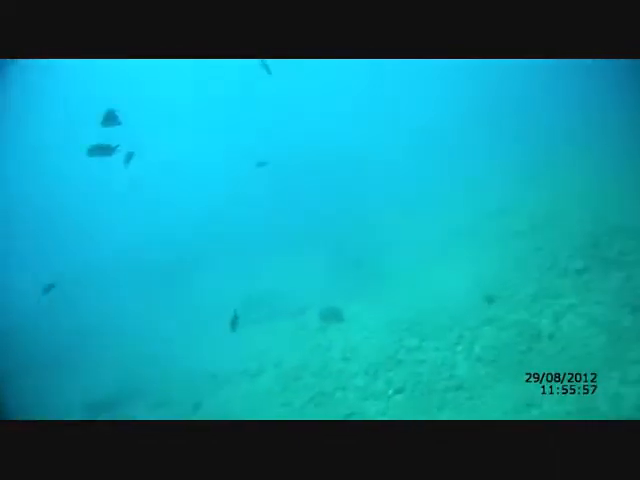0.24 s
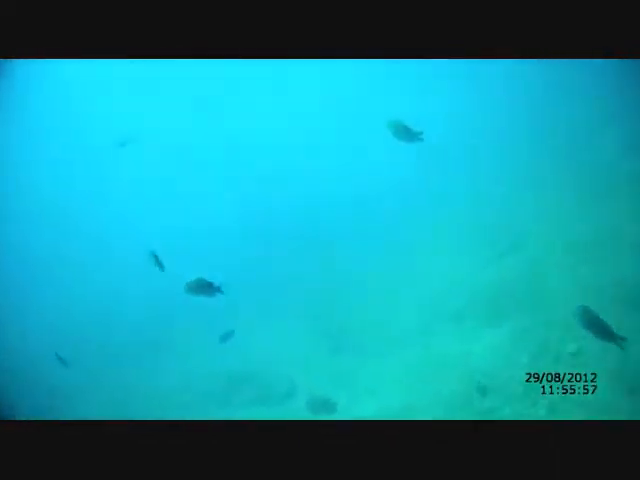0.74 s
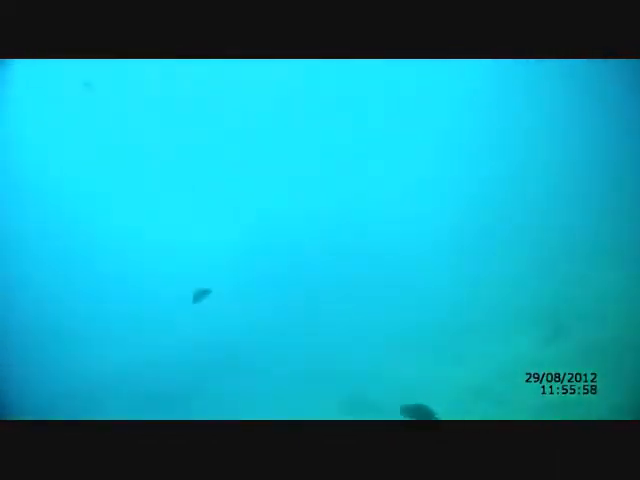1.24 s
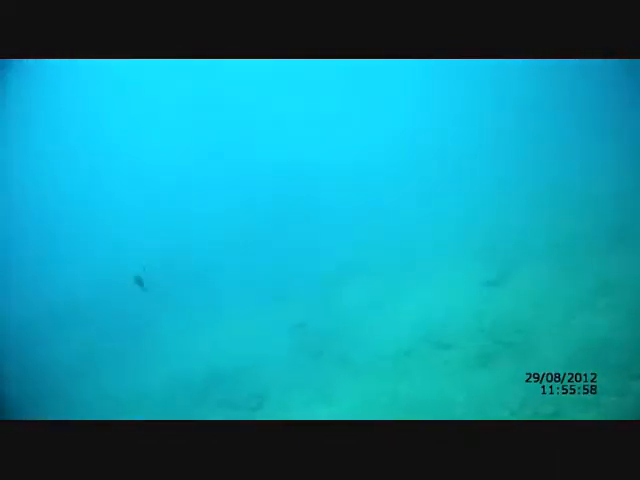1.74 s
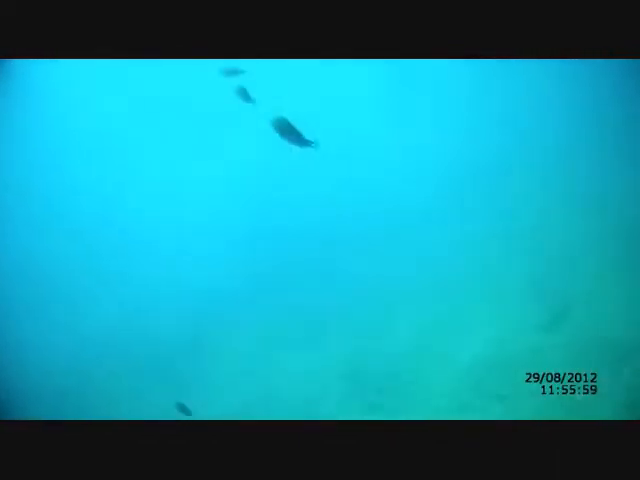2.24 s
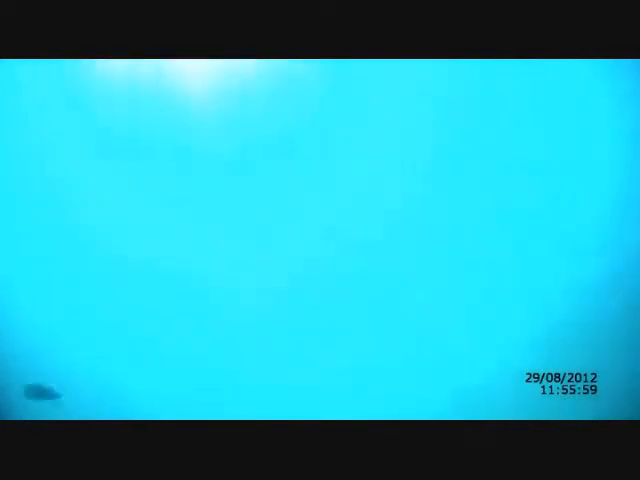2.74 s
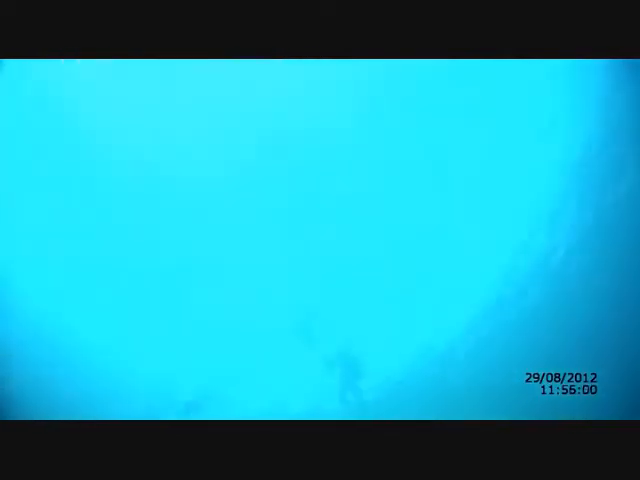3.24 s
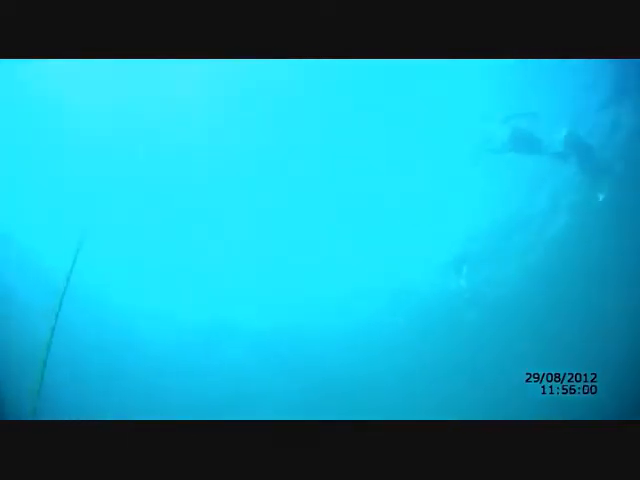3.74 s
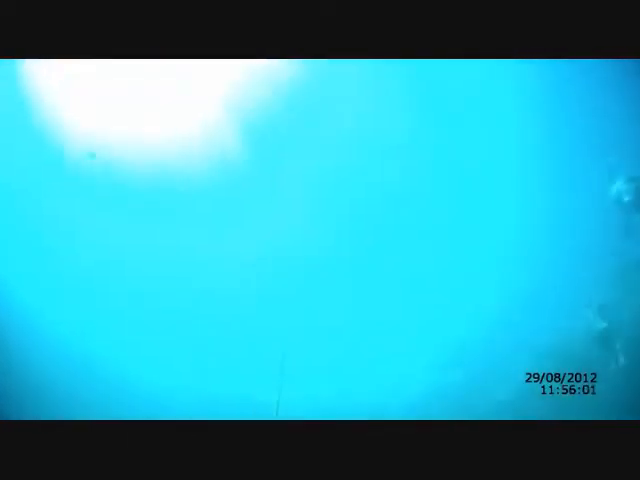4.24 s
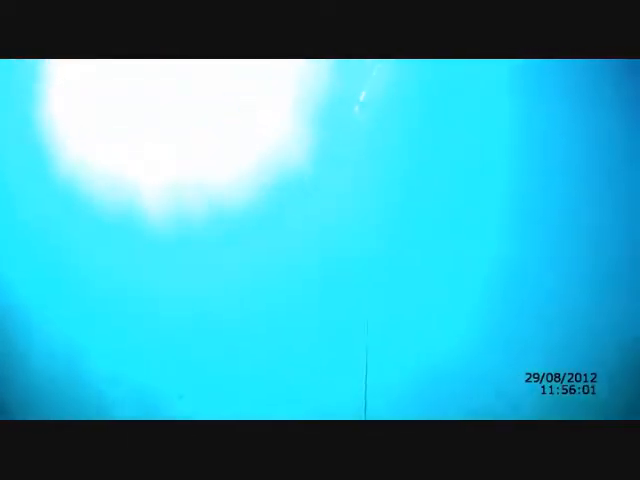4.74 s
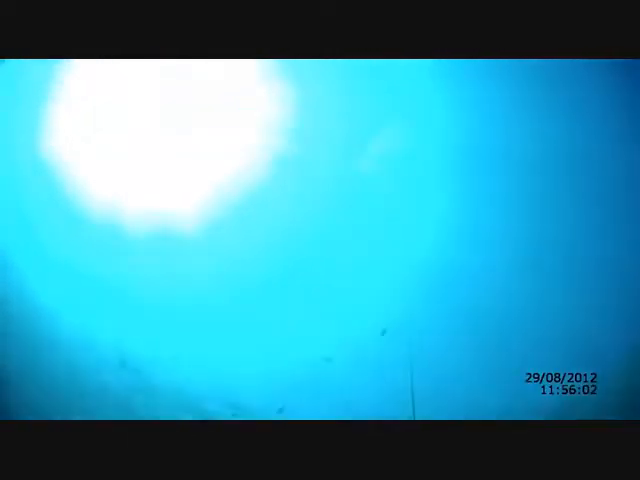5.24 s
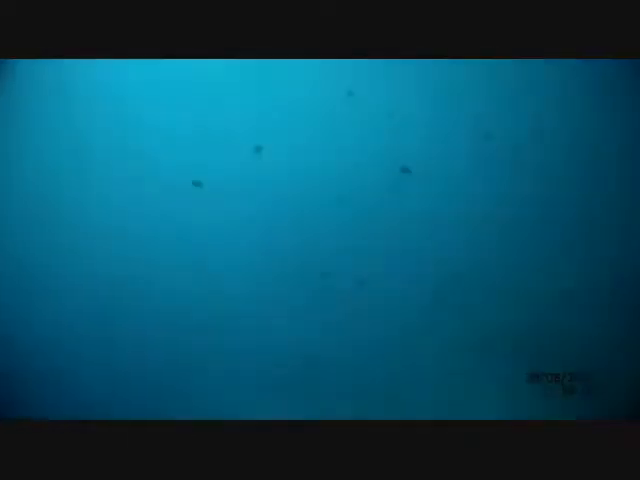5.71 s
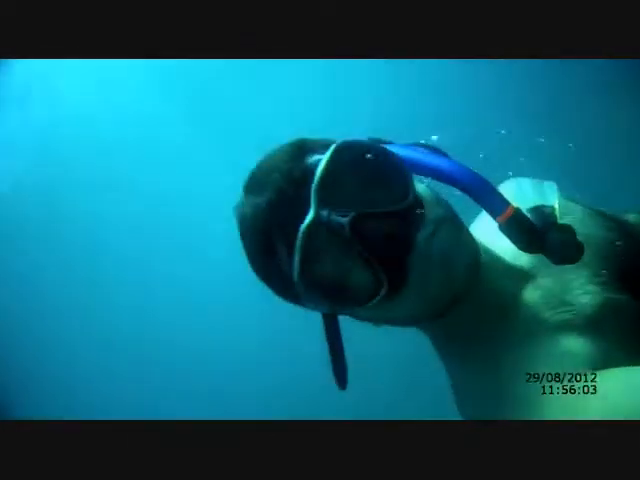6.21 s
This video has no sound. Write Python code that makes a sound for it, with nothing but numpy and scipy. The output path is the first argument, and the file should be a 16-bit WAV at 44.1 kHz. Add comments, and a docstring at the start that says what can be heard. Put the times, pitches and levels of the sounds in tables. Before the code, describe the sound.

Underwater, heard from inside a waterproof camera case: a quiet steady hiss full of fine crackle and sharp little shrimp snaps. Stirred water gurgles and fizzes in brief surges. A wet gulp comes early, hollow bubble pops cluster in the middle, and near the end fingers judder and knock the case loudly, ending on a round pop. Sound leans left over low rumble.

```python
"""Under the sea above a stony bed: a camera in a waterproof case among snapping shrimp.
Near snaps are cracks with a brief high ring; far ones are smeared clicks over a hiss.
Stirred water is many short bubble notes: high plinks for the fizz, lower blips for the gurgle.
Pops, a gulp, finger taps, rubs and judders excite the modes of the case; soft pushes thud.
Below lie a swaying rumble and microphone hiss."""
import sys
import numpy as np
from scipy import signal
from scipy.fft import rfft, irfft, next_fast_len
from scipy.io import wavfile
from scipy.ndimage import uniform_filter1d

SR = 44100
rng = np.random.default_rng(int(sys.argv[2]) if len(sys.argv) > 2 else 0)


def generate_wav(sig):
    """Save sig (samples, or channels by samples) to the path in sys.argv[1] as 16-bit PCM at SR."""
    pcm = np.round(np.clip(np.atleast_2d(sig).T, -1, 1) * 32767).astype(np.int16)
    wavfile.write(sys.argv[1], SR, pcm)


N = 285327   # samples
PADDED = 2 * next_fast_len(N // 2 + SR // 4)   # transform length, samples

# Colour of shrimp crackle and fizz: pitch_hz, relative_gain_db
CRACKLE_COLOUR = [(400, -11), (800, -31.5), (1130, 5.5), (1500, -17.5), (2000, 2), (2900, -13.5),
                  (4000, -9.5), (4900, -0.5), (5800, 0.5), (7000, 1.5), (7700, -10), (9000, -12.5),
                  (10500, -18), (15000, -33)]


def from_db(db):
    """Decibels to gain."""
    return 10 ** (np.asarray(db) / 20)


def rms_one(x):
    """Scale to unit power."""
    return x / np.sqrt(np.mean(x ** 2) + 1e-20)


def gain_by_bin(points):
    """A (Hz, dB) table as gains on the bins of a padded transform."""
    hz, db = np.transpose(points)
    bin_hz = np.arange(PADDED // 2 + 1) * SR / PADDED
    return from_db(np.interp(np.log(bin_hz + 1), np.log(hz), db))


def colour(x, points):
    """Causal minimum-phase filter with the given gain curve, by folding its cepstrum."""
    cepstrum = irfft(np.log(gain_by_bin(points)))
    cepstrum[1:PADDED // 2] *= 2
    cepstrum[PADDED // 2 + 1:] = 0
    response = np.exp(rfft(cepstrum))
    return irfft(rfft(x, PADDED) * response)[..., :N]


def add(track, s, sound):
    """Mix a sound into a track at a time."""
    at = max(0, round(s * SR))
    track[at:at + len(sound)] += sound[:max(0, N - at)]


def at_peak(sound, db):
    """Scale a sound so that its loudest millisecond has the power of a sine of this peak height."""
    loudest_power = uniform_filter1d(sound ** 2, SR // 1000).max()
    return sound * from_db(db) / np.sqrt(2 * loudest_power)


def ring(hz, t60):
    """A sine that falls 60 dB in t60 seconds, cut at 0.1 s."""
    t = np.arange(SR // 10) / SR
    return np.sin(2 * np.pi * hz * t) * np.exp(-np.log(1000) * t / t60)


def bubble(hz, t60, swell_s=0.0036):
    """A bubble swells into its note and dies away."""
    swell = 1 - np.exp(-np.arange(SR // 10) / SR / swell_s)
    return ring(hz, t60) * swell


def thud(hz, cycles):
    """The case wall swings up within half a cycle and falls 60 dB in the given cycles."""
    return bubble(hz, cycles / hz, swell_s=1 / (np.pi * hz))


def contact(length_s, count=4):
    """A rough touch: a dying noise burst, repeatedly flattened to drive all pitches about evenly."""
    age = np.arange(SR // 10) / SR / length_s
    force = rng.standard_normal(len(age)) * np.exp(-age ** 2)
    for _ in range(count):
        phase = np.angle(rfft(force))
        force = irfft(np.exp(1j * phase), len(age)) * np.exp(-(age / 2) ** 2)
    return force


def struck(response, length_s):
    """A response set off by a rough contact."""
    return signal.fftconvolve(contact(length_s), response)[:len(response)]


def case_ring(low_hz, high_hz, spread_db=6.5, direct=1.84):
    """The case answers a band-limited blow with a direct crack and modes of scattered level."""
    # Modes of the case: mode_hz, level_db before scatter, t60_s
    modes = [(155, -50, .035), (222, -5.5, 0.013), (460, -7.5, 0.08), (580, -17, 0.027), (866, -9.5, 0.037),
             (1024, -3, 0.029), (1304, 2.5, 0.01), (1360, -37, 0.012), (1630, -18, 0.034),
             (1803, -5, 0.038), (2087, -2, 0.015), (2340, -4, 0.027), (3550, -8, 0.014), (3770, -9, 0.024),
             (4910, 4, 0.0081), (5500, 3, 0.021), (6840, -30, 0.015), (8650, -6, 0.022),
             (10500, -8, 0.0046)]
    out = np.zeros(SR // 10)
    for k, (hz, db, t60) in enumerate(modes):
        gain = from_db(db + spread_db * rng.standard_normal())
        out += gain * ring(hz, t60) * (-1) ** k
    out[:3] += direct * len(modes) * np.array([.25, .5, .25])
    top_hz = np.clip(high_hz, 1.1 * low_hz, .45 * SR)
    band = signal.butter(3, [low_hz, top_hz], "band", fs=SR, output="sos")
    return signal.sosfilt(band, out)


def clicks(per_s, spread_db, count=1500):
    """Random clicks of either sign, many faint and a few strong."""
    when, size, sign = rng.random((count, 3))[:int(per_s * N / SR) + 1].T
    strength = np.minimum(-np.log(1 - size), 4)
    height = from_db(spread_db * strength) * np.sign(sign - .5)
    return np.bincount((when * N).astype(int), height, N)


def strays(loud_rows, per_s, db, spread_db):
    """Faint events at random times, pitched like the loud ones: start_s, level_db, pitch_hz."""
    when, size, pitch = rng.random((int(per_s * N / SR), 3)).T
    level_db = db + spread_db * (2 * size - 1)
    pitch_hz = np.quantile(np.array(loud_rows)[:, 2], pitch)
    return list(zip(when * N / SR, level_db, pitch_hz))


def snaps(crack_db=-13.5, note_db=-7.0, crack_s=0.0041):
    """Near shrimp snaps: a crack about an octave wide and a brief ring, longer at low pitch."""
    # Sharpest near snaps: start_s, level_db before crack and note gains, pitch_hz
    near_snaps = [(0.065, -34.5, 4700), (0.1496, -33, 6800), (0.216, -30, 5540), (0.288, -22.5, 6350),
                  (0.5656, -30, 5640), (0.594, -28, 4800), (0.752, -30, 5700), (1.2785, -31.5, 5740),
                  (1.4476, -31.5, 5790), (1.7983, -32, 5960), (1.9126, -34, 6880), (2.1365, -34, 5690),
                  (2.2646, -27, 5060), (2.373, -36.5, 3630), (2.3953, -28.5, 3920), (2.4418, -27.5, 4760),
                  (2.6002, -22.5, 6970), (2.677, -27.5, 4790), (2.7187, -27, 8370), (2.7842, -28, 5870),
                  (2.9312, -31.5, 5960), (3.0418, -30, 6460), (3.3076, -31, 5730), (3.6324, -33.5, 4900),
                  (3.7194, -29.5, 5800), (3.7743, -21.5, 4600), (3.875, -27, 7050), (4.4456, -29.5, 6800),
                  (4.4732, -26, 4840), (4.5486, -39, 4900), (4.8377, -27, 5000), (4.8544, -36, 6740),
                  (5.0717, -32, 7040), (5.138, -28, 6400), (5.1554, -30, 5700), (5.253, -26.5, 5030),
                  (5.9066, -24.5, 4830), (5.975, -22.5, 5260), (6.0018, -16.5, 4940), (6.0195, -20.5, 6070),
                  (6.1584, -32, 6900), (6.341, -36, 3120)]
    middle_t60_s, middle_hz = 0.016, 6030
    out = np.zeros(N)
    for s, db, hz in list(near_snaps) + strays(near_snaps, per_s=2.5, db=-35, spread_db=1.5):
        band = signal.butter(3, [.6 * hz, 1.25 * hz], "band", fs=SR, output="sos")
        t60 = middle_t60_s * (middle_hz / hz) ** 2
        crack = signal.sosfilt(band, contact(crack_s))
        note = signal.sosfilt(band, struck(ring(hz, t60), length_s=0.00139))
        add(out, s, at_peak(crack, db + crack_db))
        add(out, s, at_peak(note, db + note_db))
    return out


def shrimp(fizz_db, per_s=110, spread_db=5.0, crackle_db=-8.5, wash_db=-7.0):
    """Far snaps are smeared by many paths and the farthest merge into hiss; both follow fizz_db."""
    smeared = np.zeros(N)
    for _ in range(10):
        path = contact(length_s=0.00264)
        smeared += signal.oaconvolve(clicks(per_s / 10, spread_db), path)[:N]
    crackle = rms_one(colour(smeared, CRACKLE_COLOUR))
    wash = rms_one(colour(rng.standard_normal(N), CRACKLE_COLOUR))
    return from_db(fizz_db) * (from_db(crackle_db) * crackle + from_db(wash_db) * wash)


def stirring():
    """Surges over calm water, summed as power: gurgle dB, fizz dB, power-weighted lowest Hz."""
    # Surges of stirred water: full_s, hold_s, gurgle_db and fizz_db before trims, lowest_hz
    surges = [(0.091, 0.01, -51, -51.5, 915), (0.242, 0.04, -55.5, -54, 910),
              (0.385, 0.022, -45, -55.5, 720), (0.49, 0.095, -40, -40, 810),
              (0.644, 0.093, -47.5, -54, 830), (1.015, 0.37, -50.5, -67, 670),
              (1.582, 0.046, -50.5, -57, 800), (1.844, 0.058, -58, -53.5, 890),
              (2.116, 0.026, -55, -49, 920), (2.36, 0.44, -50, -56.5, 970), (2.99, 0.11, -51, -52.5, 1000),
              (3.317, 0.017, -80, -52.5, 950), (3.664, 0.19, -44.5, -62, 610),
              (3.891, 0.026, -45, -46.5, 700), (3.95, 0.17, -51, -69, 740), (4.434, 0.11, -49.5, -57, 1220),
              (4.844, 0.02, -56.5, -52, 1020), (5.135, 0.02, -51.5, -49.5, 980),
              (5.241, 0.021, -55, -52, 1030), (5.933, 0.068, -48.5, -54, 1010),
              (6.347, 0.016, -43, -51, 1030)]
    rise_db_per_s, fall_db_per_s = 411, 138
    calm_gurgle_db, calm_fizz_db, calm_hz = -59, -54.5, 935   # levels before trims
    t = np.arange(N) / SR
    gurgling, fizzing = from_db(calm_gurgle_db) ** 2, from_db(calm_fizz_db) ** 2
    pitch = calm_hz * gurgling
    for s, hold_s, gurgle_db, fizz_db, hz in surges:
        rise_db = rise_db_per_s * (t - s)
        fall_db = fall_db_per_s * (s + hold_s - t)
        shape_db = np.clip(np.minimum(rise_db, fall_db), -90, 0)
        gurgle_power = from_db(shape_db + gurgle_db) ** 2
        gurgling = gurgling + gurgle_power
        fizzing = fizzing + from_db(shape_db + fizz_db) ** 2
        pitch = pitch + gurgle_power * hz
    return 10 * np.log10(gurgling), 10 * np.log10(fizzing), pitch / gurgling


def fizz(fizz_db, per_s=1100, spread_db=5.5, trim_db=-3.5, clump_db=4.0):
    """Tiny bubbles plink briefly at one of 26 pitches; their level wanders so that they clump."""
    cycles, clump_s = 34, .03   # cycles to fall 60 dB
    pitches = np.geomspace(2300, 9000, 26)
    plinks = np.zeros(N)
    for hz in pitches:
        born = clicks(per_s / len(pitches), spread_db)
        plinks += signal.oaconvolve(born, ring(hz, cycles / hz))[:N] * np.sqrt(hz)
    clumps = rms_one(uniform_filter1d(rng.standard_normal(N), int(clump_s * SR)))
    clumped = colour(plinks, CRACKLE_COLOUR) * from_db(clump_db * clumps)
    return from_db(fizz_db + trim_db) * rms_one(clumped)


def gurgle(gurgle_db, lowest_hz, spread_db=5.0, trim_db=-2.5, churn_db=-9.5, size_range=2.4):
    """Bubbles of 32 sizes on churning water, heard through the case; lowest_hz sets the largest."""
    # Colour of the gurgle: pitch_hz, relative_gain_db
    gurgle_colour = [(150, -6), (330, -29.5), (470, -10), (600, -17.5), (820, -3), (930, -14.5), (1120, -3),
                     (1480, -17.5), (1640, -5.5), (1770, -17.5), (1980, 0.5), (2500, -7), (2950, -8.5),
                     (4000, -4)]
    per_s, t60_at_1khz_s = 600, .028
    blips = np.zeros(N)
    pitches = np.geomspace(450, 4200, 32)
    for hz in pitches:
        born = clicks(per_s / len(pitches), spread_db)
        at = np.flatnonzero(born)
        too_large = 1 + (lowest_hz[at] / hz) ** 6
        too_small = np.hypot(1, hz / lowest_hz[at] / size_range)
        born[at] /= too_large * too_small
        blips += signal.oaconvolve(born, bubble(hz, t60_at_1khz_s * np.sqrt(1000 / hz)))[:N]
    lowpass = signal.butter(2, 2600, fs=SR, output="sos")
    churn = from_db(churn_db) * rms_one(signal.sosfilt(lowpass, rng.standard_normal(N)))
    return from_db(gurgle_db + trim_db) * rms_one(colour(rms_one(blips) + churn, gurgle_colour))


def pops(case_db=-4.0, trim_db=-3.5, t60=0.042, touch_s=.0024):
    """A bubble on the case sounds its own note and sets the case ringing."""
    # Loudest bubbles on the case: start_s, level_db before trim, pitch_hz
    loud_pops = [(0.33, -37, 1114), (0.395, -31.5, 1106), (0.414, -32, 1110), (0.573, -37, 1910),
                 (0.608, -33.5, 1223), (0.713, -40, 786), (0.785, -31.5, 1570), (1.139, -38.5, 1065),
                 (1.368, -38.5, 1217), (1.662, -38, 1150), (1.745, -44, 1160), (1.913, -37.5, 2010),
                 (2.06, -41, 1650), (2.128, -38.5, 1050), (2.264, -40, 912), (2.395, -29.5, 1245),
                 (2.485, -35.5, 1285), (2.603, -21, 2085), (2.667, -23, 1170), (2.72, -24.5, 1170),
                 (2.971, -36, 2000), (2.985, -33.5, 1094), (3.693, -29.5, 1166), (3.775, -30, 1080),
                 (3.798, -27, 1037), (3.972, -29, 790), (4.038, -25, 1050), (4.065, -35.5, 821),
                 (4.095, -41, 996), (4.15, -35.5, 1206), (4.176, -37.5, 1004), (4.353, -39, 1090),
                 (4.446, -41.5, 1095), (4.469, -36.5, 1630), (4.549, -40, 1820), (4.583, -36, 1910),
                 (4.672, -38, 1187), (4.745, -38.5, 1234), (4.904, -37.5, 1145), (5.297, -40, 1230),
                 (5.946, -35, 1030), (5.975, -32, 1115), (6.003, -30, 2110), (6.306, -19, 1148)]
    out = np.zeros(N)
    for s, db, hz in list(loud_pops) + strays(loud_pops, per_s=2.5, db=-43, spread_db=4.5):
        answer = struck(case_ring(0.42 * hz + 280, 2340), touch_s)
        add(out, s, at_peak(bubble(hz, t60, swell_s=0.0015), db + trim_db))
        add(out, s, at_peak(answer, db + case_db + trim_db))
    return out


def gulp(count=5, t60=0.024, speedup=1.405, case_db=0.0, below=1.15, above=1.68,
         top_hz=2700, bottom_hz=1100, shove_db=-25.0, shove_delay_s=0.0118):
    """A gulp of air breaks into ever larger, louder bubbles that strike the case; water shoves it."""
    start_s, step_s = .4835, .0049
    first_hz, last_hz = 2557, 837
    first_db, last_db = -26.5, -14.5
    out = np.zeros(N)
    for k, progress in enumerate(np.linspace(0, 1, count)):
        s = start_s + k * step_s
        hz = first_hz * (last_hz / first_hz) ** (progress ** speedup)
        db = first_db + (last_db - first_db) * progress
        answer = case_ring(min(hz / below, bottom_hz), min(hz * above, top_hz))
        add(out, s, at_peak(bubble(hz, t60), db))
        add(out, s, at_peak(struck(answer, length_s=0.0038), db + case_db))
    shove = struck(case_ring(low_hz=263, high_hz=545), length_s=0.009)
    add(out, start_s + shove_delay_s, at_peak(shove, shove_db))
    return out


def knocks(trim_db=-0.5):
    """Fingers tap and rub the case, ringing its modes; soft pushes give a thud."""
    # Hard taps and short rubs: start_s, level_db before trim, lowest_hz, highest_hz, contact_s
    taps = [(1.745, -39.5, 202, 1500, 0.0044), (2.525, -37, 463, 950, 0.049),
            (3.688, -31, 446, 1140, 0.023), (3.806, -31, 630, 1210, 0.037),
            (3.7742, -31, 2000, 5600, 0.00057), (3.8645, -26, 2280, 7640, 0.00075),
            (4.548, -36.5, 1530, 2600, .002), (5.256, -37, 3260, 5800, 0.031),
            (5.8842, -9.5, 1010, 7400, 0.0035), (5.893, -14.5, 2100, 6160, 0.0023),
            (6.002, -38.5, 342, 540, .035), (6.106, -44, 320, 594, 0.031),
            (6.376, -25.5, 3780, 9200, 0.019)]
    # Soft pushes: start_s, level_db before swell, pitch_hz
    pushes = [(0.491, -27.5, 155), (0.895, -41, 123), (1.745, -30.5, 114), (2.216, -41, 119),
              (2.759, -41, 150), (3.331, -42, 118), (3.386, -38, 130)]
    out = np.zeros(N)
    for s, db, low_hz, high_hz, contact_s in taps:
        tap = struck(case_ring(low_hz, high_hz, direct=2.75), contact_s)
        add(out, s, at_peak(tap, db + trim_db))
    for s, db, hz in pushes:
        add(out, s, from_db(db) * thud(hz, cycles=5.06))
    return out


def judders(count=4, touch_s=0.0028, grip_db=-0.5):
    """A finger slips four times in quick succession; the wall booms at the first and last slip."""
    # Judders: start_s, slip_peak_db, lowest_hz, highest_hz, boom_db before swell and grip, boom_hz
    slides = [(5.426, -27, 120, 795, -33, 159), (5.811, -15.5, 185, 6000, -12, 435)]
    slip_s, boom_cycles = 0.0045, 14   # slip to slip; cycles to fall 60 dB
    out = np.zeros(N)
    for s, db, low_hz, high_hz, boom_db, boom_hz in slides:
        for k in range(count):
            slip = struck(case_ring(low_hz, high_hz, spread_db=8.0, direct=0.5), touch_s)
            add(out, s + k * slip_s, at_peak(slip, db))
        boom = from_db(boom_db) * thud(boom_hz, boom_cycles)
        add(out, s, from_db(grip_db) * boom)
        add(out, s + (count - 1) * slip_s, boom)
    return out


def through_case(sea):
    """The case passes its sound mostly to the left; left and right gains average one."""
    # Lean to the left: pitch_hz, left_minus_right_db
    lean_points = [(60, -4), (140, -6.5), (280, 4), (450, 8.5), (900, 8.5), (2000, 6), (5000, 6), (9000, 5),
                   (14000, -3)]
    lean = gain_by_bin(lean_points)
    left_right = 2 * np.array([lean, np.ones_like(lean)]) / (1 + lean)
    return irfft(rfft(sea, PADDED) * left_right)[:, :N]


def rumble(side_db=-11.0, trim_db=10.5):
    """Water presses on the swaying case: low noise, a little stronger on the right."""
    # Sway of the camera: time_s, rumble_db before trim
    sway = [(0.0, -64), (0.07, -65), (5.39, -65.5), (5.42, -57), (5.68, -66), (5.77, -52), (6.33, -63),
            (6.47, -54)]
    # Colour of the rumble: pitch_hz, relative_gain_db
    rumble_colour = [(8, 13.5), (25, -0.5), (50, -3.5), (100, -16), (200, -18.5), (400, -22), (1000, -28.5),
                     (4000, -99)]
    mid, side = colour(rng.standard_normal((2, N)), rumble_colour)
    leaning = mid * from_db([[-1.5], [1.5]])
    both = rms_one(leaning + from_db(side_db) * side * [[1], [-1]])
    sway_s, sway_db = np.transpose(sway)
    level_db = np.interp(np.arange(N) / SR, sway_s, sway_db) + trim_db
    return from_db(level_db) * both


def mic_hiss(level_db=-61.5):
    """Each microphone has its own coloured noise."""
    # Colour of the hiss: pitch_hz, relative_gain_db
    hiss_colour = [(30, -7), (200, -2.5), (600, -3), (2000, -5.5), (7000, -9.5), (15000, -20)]
    return from_db(level_db) * rms_one(colour(rng.standard_normal((2, N)), hiss_colour))


def scene():
    """Sea and case sounds lean left; rumble and hiss join in stereo."""
    gurgle_db, fizz_db, lowest_hz = stirring()
    sea = snaps() + shrimp(fizz_db)
    sea += fizz(fizz_db) + gurgle(gurgle_db, lowest_hz)
    sea += pops() + gulp() + knocks() + judders()
    return through_case(sea) + rumble() + mic_hiss()


def record(dry):
    """A steep low-pass cuts the top; a small steady offset is added."""
    cutoff_hz, offset = 15300, .004
    lowpass = signal.ellip(10, .1, 70, cutoff_hz, fs=SR, output="sos")
    return offset + signal.sosfilt(lowpass, dry)


dry = scene()
out = record(dry)
generate_wav(out)
```